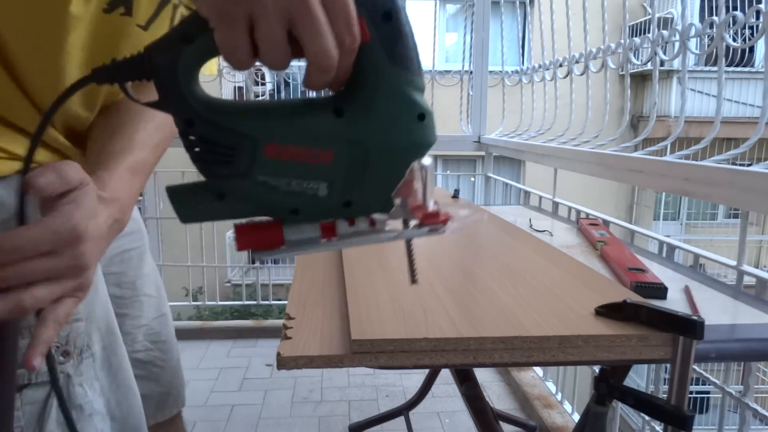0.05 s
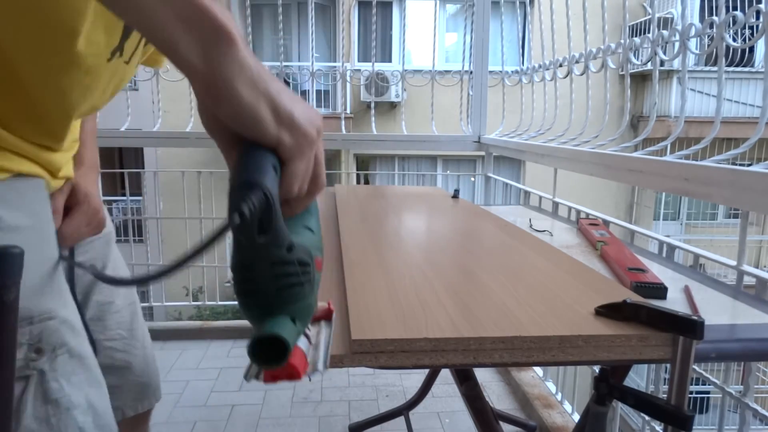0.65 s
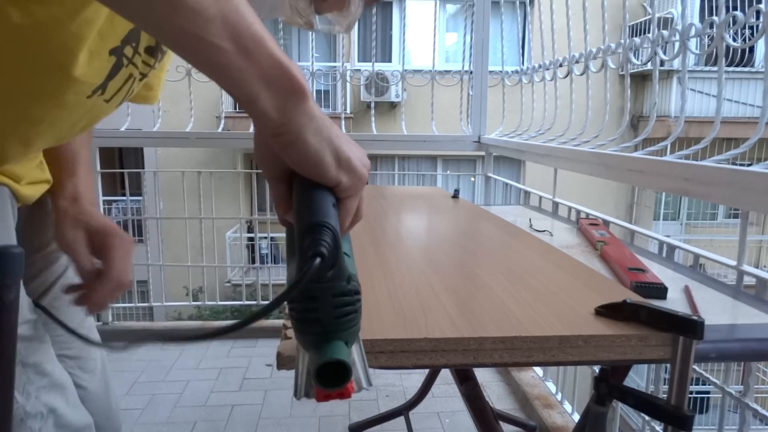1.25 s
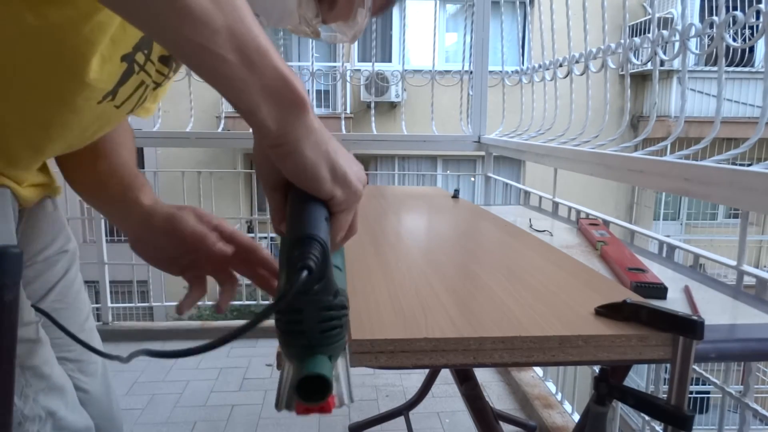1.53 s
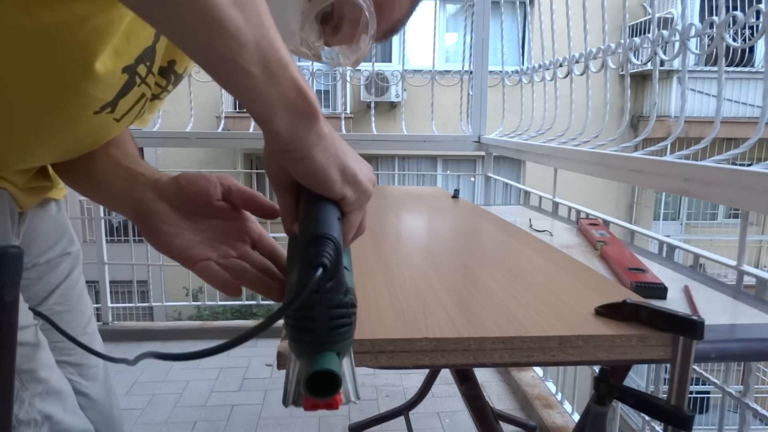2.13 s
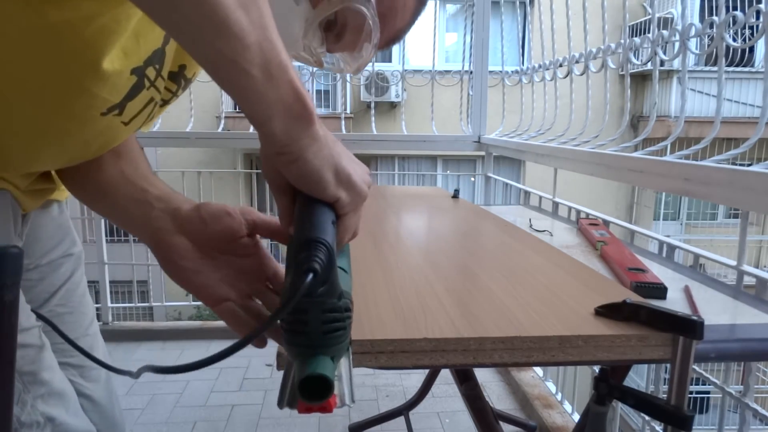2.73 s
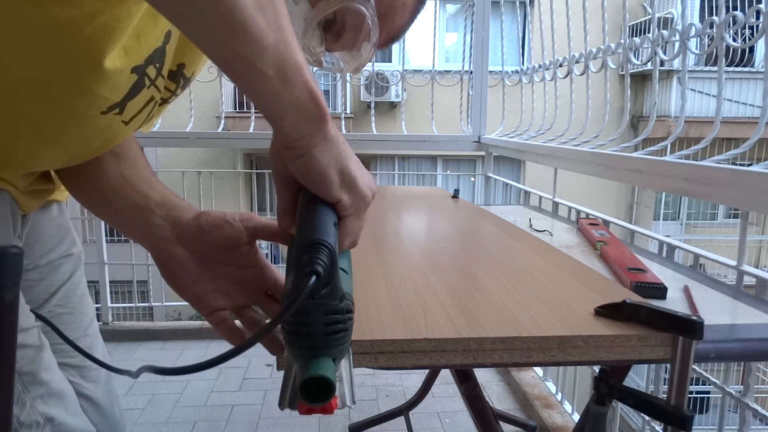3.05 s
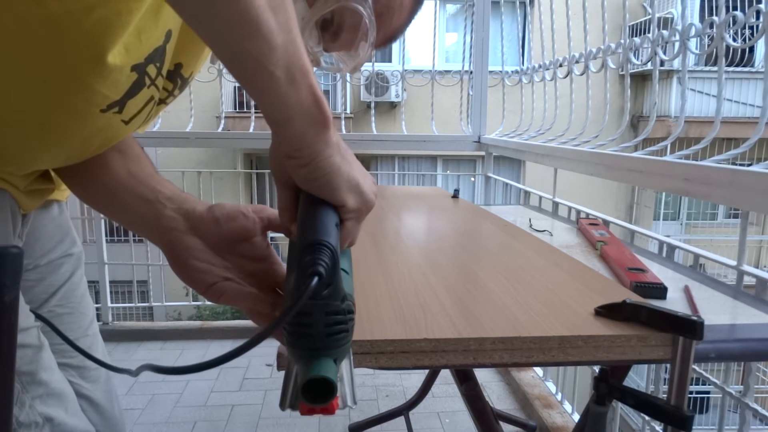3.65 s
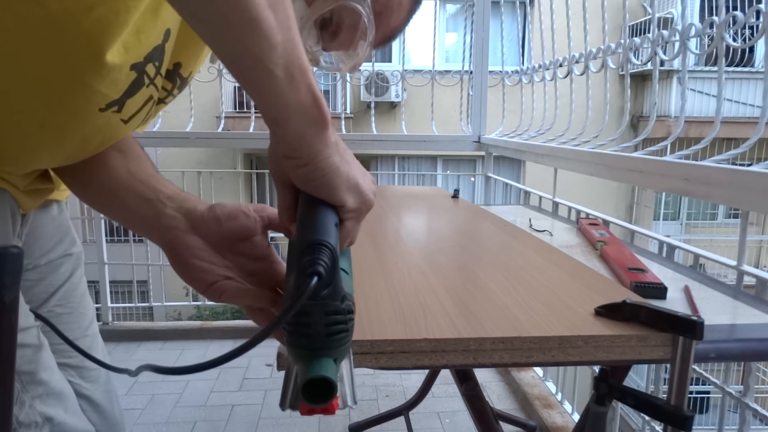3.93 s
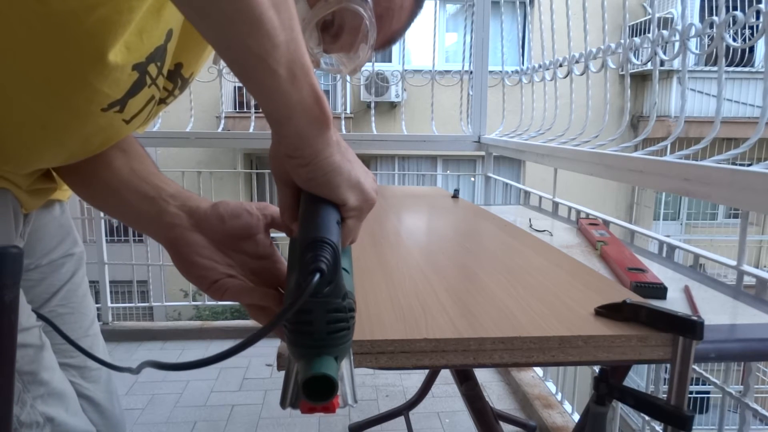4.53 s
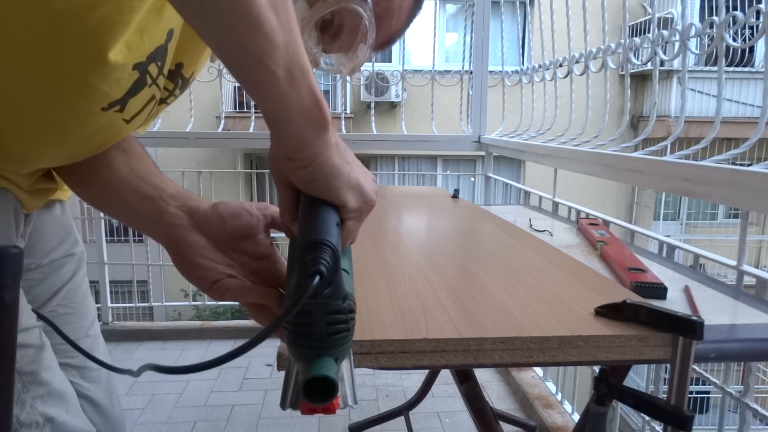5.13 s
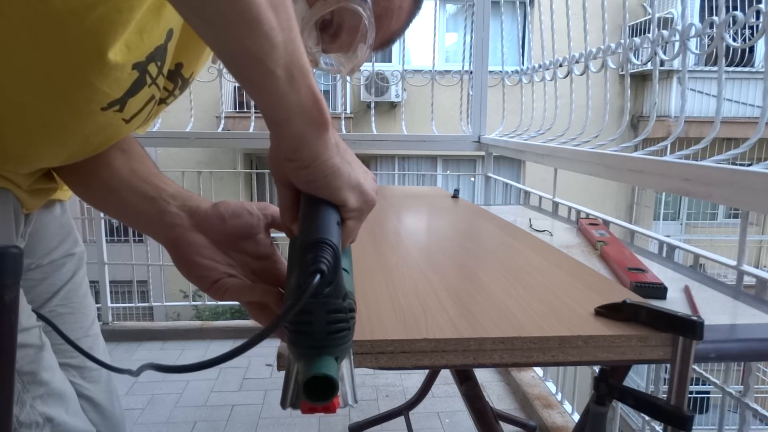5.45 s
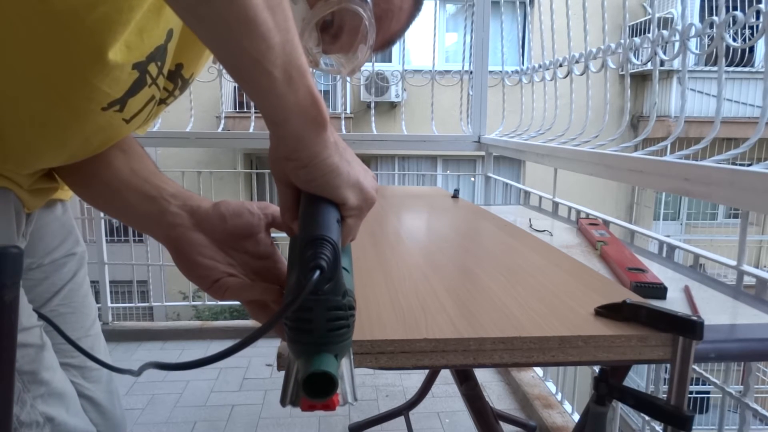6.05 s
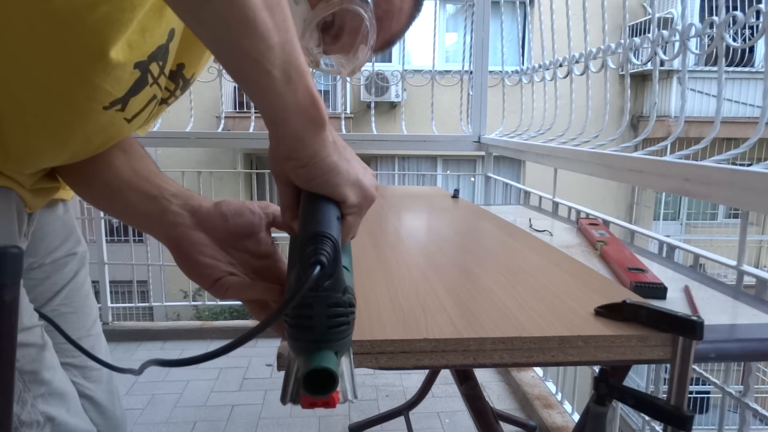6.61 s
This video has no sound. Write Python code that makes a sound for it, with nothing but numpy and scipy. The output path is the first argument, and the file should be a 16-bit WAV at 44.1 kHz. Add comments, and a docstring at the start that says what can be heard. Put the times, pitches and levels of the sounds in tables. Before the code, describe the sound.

A power cord slides through a hand and clothes rustle softly. A jigsaw is set on a wooden board with a few light clacks, and its trigger clicks. About halfway through, the motor starts slowly, rattling and knocking, then speeds up into a loud, rasping cut with a rising high whine. The saw is close to the microphone, outdoors on a balcony, with faint traffic behind it.

```python
"""A cord slides through a hand, clothes brush, and a jigsaw's shoe clacks down on a clamped chipboard panel.
The trigger clicks and the motor is eased up to speed. The crank rattles tool and board on every stroke,
the blade rasps, and the gear whine climbs through the resonances of the housing.
Short echoes come off the balcony; behind it the town murmurs, with a few faint, far squeals."""
import sys
import numpy as np
from scipy import signal
from scipy.fft import rfft, irfft, next_fast_len
from scipy.io import wavfile
from scipy.ndimage import uniform_filter1d, map_coordinates

SR = 44100
rng = np.random.default_rng(int(sys.argv[2]) if len(sys.argv) > 2 else 0)


def wrap_up_sound(samples):
    """Save the sound to the file named by the first command line argument, as 16-bit audio."""
    columns = np.atleast_2d(samples).T
    # keep every value between -1 and 1, then stretch to whole-number steps
    tamed = np.clip(columns, -1, 1)
    steps = np.round(tamed * 32767).astype(np.int16)
    wavfile.write(sys.argv[1], SR, steps)


N = 303408
TIME = np.arange(N) / SR
FFT_SIZE = 2 * next_fast_len(N // 2 + SR // 4)
HZ = np.maximum(np.arange(FFT_SIZE // 2 + 1) * SR / FFT_SIZE, 1)

# The motor's run-up. Each row: time in seconds, mesh rate in gear teeth per second.
RUN_UP = [(3.695, 105), (3.755, 118), (3.77, 164), (3.93, 263), (4.24, 397), (4.33, 413), (4.43, 439),
          (4.58, 512), (4.79, 747), (5.16, 1307), (5.29, 1438), (5.46, 1534), (5.7, 1611), (5.86, 1634),
          (6.17, 1666), (6.31, 1689), (6.52, 1802), (6.68, 1857), (6.88, 1893)]
CRANK_TEETH, PINION_TEETH, TEETH_PER_BOUNCE = 56, 4, 42.7
TAKE_UP_S = .025  # the drive takes up its play
# Depths of the tool's judder and the pinion's chatter at full slack; both shrink as the speed rises.
JUDDER_DB, PANEL_JUDDER_DB, WHINE_CHATTER_DB, HOUSING_CHATTER_DB = 1.5, 2.5, 5.5, 2.2
# Loudness with speed. Each law: relative top in dB, knee in teeth per second, dB per decade below it.
HOUSING_LAW, BLADE_LAW, SHOE_LAW = (-19, 675, 32.7), (-20, 990, 35.4), (-30.5, 930, 31.4)
PANEL_LAW, ROLLER_LAW = (-49.5, 600, 30), (-30.5, 380, 30)
# The broad tone of the sawing. Each row: frequency in Hz, relative level in dB.
SAW_TONE = [(53, -101), (90, -46), (350, -23), (381, -16), (504, -12.5), (562, -15), (864, -8),
            (1120, -6.5), (2090, 0.5), (2540, -1.5), (3290, 0), (4540, -10), (7140, 1), (9050, -5.5),
            (15500, -22.5)]
# Resonances and hollows of tool and board. Each row: centre in Hz, width in Hz, lift in dB.
BODY_MODES = [(218, 40, 10), (316, 36, 13), (385.7, 17, 11), (505, 70, -11), (576, 22, 7.5), (648, 22, 4),
              (680, 22, -4), (712, 30, 6), (841, 20, 9.5), (897, 24, 9), (980, 26, 3.5), (1058, 24, 5),
              (1118, 40, -8), (1385, 70, 4.5), (1550, 30, -3.5), (1645, 80, 6.5), (1790, 40, 4),
              (1957, 34, 6), (2120, 90, 4), (2460, 60, -3), (2715, 60, 3.5), (2900, 90, 2), (3150, 270, 5),
              (3325, 70, 2), (4130, 430, 6), (4540, 690, 2.5), (4900, 290, 6), (5790, 70, 5), (6110, 70, 4),
              (6990, 90, 2.5), (7305, 70, 2), (8800, 150, 5), (9070, 690, 4.5), (11900, 480, -6)]
# The partials of the gear whine. Each row: multiple of the mesh rate, relative level at rest in dB,
# change at full speed in dB, mesh rate where it sets in, in teeth per second.
WHINE_PARTIALS = [(1, -26.5, 16.5, 1500), (2, -19, 6.5, 620), (3, -12.5, 0, 860), (4, -19, 6, 1200),
                  (6, -23, 9, 1350), (6.5, -24, 6, 1720), (8, -1.5, -28, 235), (11, 2, -36, 860)]
# Resonances and hollows the whine climbs through. Each row: centre in Hz, width in Hz, lift in dB.
WHINE_MODES = [(1400, 150, 14), (1720, 200, -3), (2100, 150, 14), (2500, 500, -10), (3010, 130, 11),
               (3220, 140, 9), (3335, 90, 10), (3650, 200, -1), (4100, 200, 3), (4700, 1600, -6),
               (5000, 300, 3), (5830, 220, 2), (6950, 240, 11), (7280, 180, 7), (8870, 300, 9),
               (9830, 280, 12), (10350, 400, -7), (10830, 300, 10), (12000, 4000, -13), (13300, 300, 5)]
# The rattle lapses as the blade loses its bite. Each row: time in seconds, half length in seconds, dip in dB.
BITE_LAPSES = [(3.993, .012, -8), (4.34, .008, -4)]
# The blade snags and the shoe bumps the board. Each row: start in seconds, level in dB, treble in dB.
SNAGS = [(3.761, -36, -6), (3.823, -25, -7), (3.829, -27, -5), (4.138, -22, 2), (4.189, -24, -6),
         (4.346, -14, -6), (4.353, -18, -5), (4.392, -20, -1), (4.451, -22, -4), (4.534, -9, -10),
         (4.568, -18, -2), (4.61, -19, -5), (4.686, -11.5, -3), (4.692, -12.5, -2), (4.806, -13, -12),
         (4.887, -12, -12)]
# How firmly the shoe is pressed on the board. Each row: time in seconds, gain in dB.
SHOE_PRESSURE = [(4.6, 3.5), (5.4, -0.5), (6.12, -2.5), (6.35, -0.5), (6.66, 2.5), (6.88, 0.5)]
# The panel's boom sets in as the blade bites. Each row: time in seconds, relative level in dB.
PANEL_BOOM = [(3.85, -80), (3.9, -50), (4.15, -48.5), (4.62, -41), (4.87, -38.5), (5.15, -52),
              (5.56, -41.5), (5.74, -57), (6.14, -45), (6.38, -46), (6.66, -44.5), (6.88, -51)]
# The low modes of the clamped panel. Each row: pitch in Hz, t60 in seconds, gain in dB.
PANEL_MODES = [(212, .1, -9), (318, .12, -7), (386, .27, 0), (578, .12, -6)]
# The board sings out as the shoe shifts. Each row: peak time, rise and fall in seconds, pitch in Hz,
# level in dB.
BOARD_RINGS = [(5.4, .3, .35, 897, -34.5), (5.75, .15, .15, 577, -42), (6.4, .18, .1, 833, -34.5),
               (6.72, .12, .16, 842, -32)]
# The modes of the guide roller. Each row: pitch in Hz, t60 in seconds, relative level in dB.
ROLLER_MODES = [(1447, .06, -7), (1974, .045, 3), (2100, .035, 10), (3270, .018, -1)]
# The roller's chatter flares and fades. Each row: time in seconds, gain in dB.
ROLLER_FLARE = [(3.7, -11), (3.78, -3), (3.86, 2), (3.9, -2), (3.97, 6.5), (3.99, 0), (4.02, 6), (4.09, 1),
                (4.16, -9), (4.28, -4), (4.37, -8), (4.47, -8), (4.6, -8), (4.72, -9), (4.82, 9),
                (4.92, -13), (5.2, -8)]

# The shoe is set on the board. Each row: start in seconds, relative level in dB, treble in dB,
# t60 of the clatter in seconds, favoured pitch in Hz.
SHOE_TAPS = [(1.385, -42, -17, .06, 1200), (1.557, -39, -5, .11, 2400), (1.57, -37, -14, .065, 1350),
             (1.671, -32.5, 0, .063, 3600), (1.682, -34, -5, .07, 800)]
# The tone of the shoe's clatter. Each row: frequency in Hz, relative level in dB.
SHOE_TONE = [(120, -57), (200, -37), (335, -10), (495, -30), (815, -11), (1390, -9), (2450, -6),
             (2830, -17), (3200, -9), (3890, -6), (6290, -10), (7510, -6.5), (14000, -41)]
# Resonances and a hollow in that clatter. Each row: centre in Hz, width in Hz, lift in dB.
SHOE_MODES = [(754, 79, 13.5), (1160, 48, -2), (1860, 96, 7), (2874, 140, 18)]
# The board rings under a tap. Each row: pitch in Hz, t60 in seconds, relative level in dB.
WOOD_MODES = [(824, .07, -5), (1179, .11, -1), (1389, .1, 0), (2078, .08, -7), (2390, .07, -3),
              (2783, .06, -6), (3876, .04, 0)]
# The trigger clicks. Each row: start in seconds, relative level in dB, treble in dB, t60 in seconds.
TRIGGER_CLICKS = [(2.745, -54, 4, 0.034), (3.108, -42.5, -3, 0.045), (3.666, -36.5, -3, 0.08)]
# The tone of the trigger. Each row: frequency in Hz, relative level in dB.
TRIGGER_TONE = [(880, -46), (1500, -20), (2940, -34), (3930, -2), (4770, -17), (7350, 1), (13100, -30),
                (15000, -55)]
# The cord runs through the hand. Each row: time of the fastest slide, rise and fall in seconds, level in dB.
CORD_PULLS = [(.168, 0.065, 0.12, -35), (0.586, 0.059, 0.049, -33)]
# Clothes brush as the arm moves. Each row: peak time in seconds, level in dB.
RUSTLES = [(.375, -59), (.86, -48), (.935, -48.5), (1.035, -48.5), (1.11, -47.5), (1.198, -46), (2.04, -52)]
# The tone of rubbing cord and cloth. Each row: frequency in Hz, relative level in dB.
RUB_TONE = [(410, -42), (700, -10), (1020, -9), (1120, -18), (1370, -5.5), (1690, -5.5), (2220, 1),
            (4830, -1.5), (7600, 1.5), (9720, -7), (15500, -34)]

# The balance of the two microphone ports. Each row: frequency in Hz, left minus right in dB.
PORT_BALANCE = [(60, 0.0), (92, 0.0), (140, 0.0), (210, 0.0), (330, 0.0), (500, 0.0), (770, 0.35),
                (1170, 0.62), (1790, 0.77), (2740, 1), (4190, 1), (6410, 0.0), (9810, 0.0), (15000, 0.0)]
# The phase between the ports. Each row: frequency in Hz, lead of the left in radians.
PORT_LEAD = [(40, 0.1), (250, 0.4), (550, 0.6), (950, 0.6), (2200, 0.38), (4480, 0.12), (9300, 0.1),
             (10200, 0.7), (11500, 0.1), (15300, -0.0)]
# The tone of far traffic. Each row: frequency in Hz, relative level in dB.
TOWN_TONE = [(15, -76), (25, -34), (177, -7.5), (208, -3.5), (244, -5), (335, -7), (425, -12.5), (539, -13),
             (1130, -3.5), (1400, -2), (2080, -2), (4730, -11.5), (6500, -12.5), (7030, -14.5),
             (14000, -24.5)]
# The stereo width of the traffic. Each row: frequency in Hz, side minus mid in dB.
TOWN_WIDTH = [(60, -11), (130, -21), (290, -15), (640, -9.5), (1410, -9), (3100, -11), (6820, -20.5),
              (15000, -12)]
# Resonances and hollows of the yard. Each row: centre in Hz, width in Hz, lift in dB.
YARD_MODES = [(80.5, 68, -3), (298.6, 21, 8), (485, 75, -9), (927, 550, 7.5), (8100, 3300, 11.5),
              (13050, 4000, -17)]
# Faint far squeals. Each row: start in seconds, length in seconds, pitch in Hz, level in dB.
SQUEALS = [(1.237, 0.32, 1162, -55.5), (1.685, 0.49, 1097, -54.5), (2.683, 0.34, 1135, -57),
           (2.6, 0.34, 6940, -61.5), (2.946, 0.38, 6910, -54.5), (3.424, 0.16, 6915, -59)]


def jigsaw():
    """Crank knocks and rasp shake panel, shoe and housing; the thin blade only rasps."""
    mesh, = in_time(RUN_UP)
    start_s = RUN_UP[0][0]
    teeth = np.cumsum(mesh * (TIME > start_s)) / SR
    turns = teeth / CRANK_TEETH
    slack = 1 - mesh / np.max(mesh)  # slow gears run loose and rough
    judder = slack * np.cos(2 * np.pi * teeth / TEETH_PER_BOUNCE)  # the tool bounces on the board
    chatter = slack * np.cos(2 * np.pi * teeth / PINION_TEETH)  # the pinion, once a motor turn
    body_db = at_hz(SAW_TONE, HZ) + lift(BODY_MODES, HZ) + crowded_modes(ripple_db=2, spacing_hz=60)
    knocks = colour(crank_knocks(turns, jitter_s=.00005, uneven_db=1, reversal_db=-1), body_db)
    chips = colour(rasp(turns, stroke_db=.3, grain_db=1), body_db)
    board = panel_boom(knocks, chips, judder) + panel_hum(mesh, turns) + board_rings()
    shoe = shoe_rattle(mesh, turns, chips, judder, body_db)
    housing = housing_rattle(mesh, knocks, chips, slack, judder, chatter)
    roller = roller_chatter(mesh, knocks + chips, slack, judder)
    blade_db = speed_db(mesh, BLADE_LAW) + JUDDER_DB * judder - 1.76
    blade = from_db(blade_db) * even(band(chips, 4670, 14100))
    gears = gear_whine(mesh, turns, slack, chatter)
    bite = from_db(sum(db * swell(s, half, half) for s, half, db in BITE_LAPSES))
    engaged = np.clip((TIME - start_s) / TAKE_UP_S, 0, 1)
    return (board + shoe + (housing + roller + gears) * bite + blade) * engaged + blade_snags(body_db)


def crank_knocks(turns, jitter_s, uneven_db, reversal_db, count=40):
    """Loose parts knock at the same crank angles every turn; reversal_db weights the stroke ends."""
    angles = (np.arange(count) + rng.random(count)) / count
    force = rng.choice([-1, 1], count) * from_db(reversal_db * np.cos(4 * np.pi * angles))
    when = np.interp(np.arange(256)[:, None] + angles, turns, TIME, right=-1)
    at = np.round((when + jitter_s * rng.standard_normal(when.shape)) * SR).astype(int)
    force = force * from_db(uneven_db * rng.standard_normal(when.shape))
    heard = (at >= 0) & (at < N)
    return even(np.bincount(at[heard], force[heard], N))


def rasp(turns, stroke_db, grain_db):
    """Teeth tear chips out of the board, in a surge on each half stroke."""
    surge_db = stroke_db * np.cos(4 * np.pi * turns) + grain_db * drift(700)
    return even(rng.standard_normal(N) * from_db(surge_db))


def gear_whine(mesh, turns, slack, chatter, sway=.28, throb_db=3, wander=.17, flutter_db=2.2):
    """Gear teeth sing; each half stroke loads them, which puts side lines on every partial."""
    load = np.cos(4 * np.pi * turns)
    phase = 2 * np.pi * CRANK_TEETH * turns + sway * load + wander * (1 + slack) * drift(70)
    tone = np.zeros(N)
    for k, level_db, rise_db, onset in WHINE_PARTIALS:
        swell_db = level_db + rise_db * (1 - slack) + lift(WHINE_MODES, k * mesh)
        gain = from_db(swell_db + flutter_db * drift(140)) / (1 + (onset / mesh) ** 24)
        tone += gain * np.sqrt(2) * np.sin(k * phase)
    # Narrow high modes break up the upper partials.
    ripple_db = crowded_modes(ripple_db=4, spacing_hz=60) * np.minimum(HZ / 10000, 1)
    tone = colour(tone * from_db(WHINE_CHATTER_DB * chatter), ripple_db)
    tone = band(tone, 1250, 12500)  # the small housing radiates no bass and muffles the very top
    return from_db(speed_db(mesh, HOUSING_LAW)) * tone * rms_one(from_db(throb_db * load))


def housing_rattle(mesh, knocks, chips, slack, judder, chatter):
    """The housing carries rasp and knocks in the upper mids, roughened by the slack pinion."""
    level_db = speed_db(mesh, HOUSING_LAW) + JUDDER_DB * judder + HOUSING_CHATTER_DB * chatter
    return from_db(level_db - 3.5 - .22 * slack) * even(band(knocks + from_db(6.5) * chips, 965, 4400))


def blade_snags(body_db, t60=.03):
    """The blade catches and the shoe bumps the board in short, hard knocks."""
    return band(taps([(*row, t60) for row in SNAGS], body_db, treble_hz=4530), 220, 6900)


def shoe_rattle(mesh, turns, chips, judder, body_db):
    """The shoe bounces with the crank, louder the more firmly it is pressed down."""
    bounces = colour(crank_knocks(turns, jitter_s=.0001, uneven_db=2.5, reversal_db=0), body_db)
    level_db = speed_db(mesh, SHOE_LAW) + in_time(SHOE_PRESSURE)[0] + JUDDER_DB * judder - 1
    return from_db(level_db) * even(band(bounces + from_db(-7) * chips, 550, 1200))


def roller_chatter(mesh, shaking, slack, judder):
    """The guide roller is shaken into ringing while the saw runs slowly."""
    level_db = speed_db(mesh, ROLLER_LAW) + in_time(ROLLER_FLARE)[0] + JUDDER_DB * judder
    return from_db(level_db) * slack * even(ring(shaking, ROLLER_MODES))


def panel_boom(knocks, chips, judder):
    """The panel booms with the low end of the knocks and a little rasp."""
    level_db = in_time(PANEL_BOOM)[0] + PANEL_JUDDER_DB * judder - 1.5
    return from_db(level_db) * even(band(knocks + from_db(-9) * chips, 33, 460))


def panel_hum(mesh, turns):
    """Each up-stroke lifts the panel; it hums when a multiple of the stroke rate meets a mode."""
    thumps = np.diff(np.floor(turns), prepend=0) * from_db(2.2 * drift(5))
    return from_db(speed_db(mesh, PANEL_LAW)) * band(ring(thumps, PANEL_MODES), 180, 880)


def board_rings(t60=.16):
    """The scraping shoe keeps one board mode ringing unevenly for a moment."""
    return sum(from_db(db) * swell(s, rise, fall) * even(ring(rng.standard_normal(N), [(hz, t60, 0)]))
               for s, rise, fall, hz, db in BOARD_RINGS)


def handling():
    """The cord is pulled clear, clothes brush, the shoe is set down, the trigger is squeezed."""
    cord = rubbing(sum(from_db(db) * swell(s, rise, fall) for s, rise, fall, db in CORD_PULLS))
    clothes = rubbing(sum(from_db(db) * swell(s, rise_s=.04, fall_s=.04) for s, db in RUSTLES))
    trigger = from_db(1) * taps(TRIGGER_CLICKS, at_hz(TRIGGER_TONE, HZ))
    return cord + clothes + shoe_knocks() + trigger


def shoe_knocks(db_per_octave=13):
    """Each tap is a short clatter and a woody ring; where it lands decides which modes speak."""
    tone_db = at_hz(SHOE_TONE, HZ) + lift(SHOE_MODES, HZ)
    clatter = from_db(4.5) * taps([row[:4] for row in SHOE_TAPS], tone_db, treble_hz=2420)
    wood = np.zeros(N)
    for start, tap_db, _, _, favoured_hz in SHOE_TAPS:
        age = np.clip(TIME - start, 0, 1)
        for hz, t60, mode_db in WOOD_MODES:
            away_db = db_per_octave * abs(np.log2(hz / favoured_hz))
            wood += from_db(tap_db + mode_db - away_db - 60 * age / t60) * np.sin(2 * np.pi * hz * age)
    return clatter + band(wood, 650, 9000)


def rubbing(motion, grain_db=1):
    """Cord or cloth catches and slips over skin in tiny steps."""
    grains = rng.standard_normal(N) * from_db(grain_db * drift(450))
    return motion * rms_one(colour(grains, at_hz(RUB_TONE, HZ)))


def ports(x):
    """Near sounds reach the two ports with a small difference in level and phase."""
    half = from_db(at_hz(PORT_BALANCE, HZ) / 2) * np.exp(.5j * at_hz(PORT_LEAD, HZ))
    return irfft(rfft(x, FFT_SIZE) * np.array([half, 1 / half]), FFT_SIZE)[:, :N]


def balcony(x, echo_db, t60, count=40):
    """Floor, wall and railing send back sparse, thin echoes, different on each side."""
    delay_s = rng.uniform(.0024, .058, (2, count))
    strength = rng.choice([-1, 1], delay_s.shape) * from_db(-60 * delay_s / t60)
    echoes = np.zeros((2, SR // 4))
    echoes[[[0], [1]], (delay_s * SR).astype(int)] = strength
    echoes *= from_db(echo_db) / np.sqrt(np.sum(echoes ** 2) / 2)
    return signal.fftconvolve(band(x, 490, 25000)[None], echoes, axes=1)[:, :N]


def traffic(mid_db):
    """Far traffic murmurs in the yard, a little different at each port."""
    tone_db = at_hz(TOWN_TONE, HZ) + lift(YARD_MODES, HZ)
    mid, side = rms_one(colour(rng.standard_normal((2, N)), tone_db))
    return from_db(mid_db) * (mid + colour(side, at_hz(TOWN_WIDTH, HZ)) * [[1], [-1]])


def squeals(blur_hz=75.2, direct=1.2, fade_s=.13):
    """Far tones swell, hold and fade, smeared by their many paths between the houses."""
    paths = rms_one(np.abs(direct + drift(blur_hz) + 1j * drift(blur_hz)))
    smear = drift(blur_hz)
    out = np.zeros(N)
    for start, length, hz, level_db in SQUEALS:
        fade = np.clip(np.minimum(TIME - start, start + length - TIME) / fade_s + .5, 0, 1)
        out += from_db(level_db) * fade * np.sqrt(2) * np.cos(2 * np.pi * hz * TIME + smear)
    return paths * out


def taps(rows, tone_db, treble_hz=3000):
    """Contacts on one object: each is a dying crowd of modes with its own share of treble."""
    out = np.zeros(N)
    for start, level_db, treble_db, t60 in rows:
        age = TIME - start
        hit = (age >= 0) * from_db(level_db - 60 * np.clip(age / t60, 0, 3)) * rng.standard_normal(N)
        dull = signal.sosfilt(signal.butter(2, treble_hz, fs=SR, output="sos"), hit)
        out += dull + from_db(treble_db) * (hit - dull)
    return colour(out, tone_db - 10 * np.log10(np.mean(from_db(tone_db) ** 2)))


def ring(force, modes):
    """A force drives a set of decaying modes."""
    out = np.zeros(N)
    for hz, t60, gain_db in modes:
        radius, angle = from_db(-60 / (t60 * SR)), 2 * np.pi * hz / SR
        poles = [1, -2 * radius * np.cos(angle), radius * radius]
        out += from_db(gain_db) * signal.lfilter([1, 0, -1], poles, force + 1e-18)
    return out


def crowded_modes(ripple_db, spacing_hz):
    """Countless narrow high modes leave a fine ripple on the response, in dB."""
    ripple = map_coordinates(rng.standard_normal(1024), [HZ / spacing_hz], order=2, mode="wrap")
    return ripple_db * rms_one(ripple) * HZ / (HZ + 2000)


def speed_db(mesh, law):
    """A part grows louder with motor speed and levels off above a knee."""
    top_db, knee, slope_db = law
    return top_db - slope_db * np.log10(1 + (knee / mesh) ** 4) / 4


def swell(peak_s, rise_s, fall_s):
    """A smooth rise and fall of height 1."""
    late = TIME - peak_s
    return 1 / (1 + (late / np.where(late < 0, rise_s, fall_s)) ** 2) ** 2


def drift(rate):
    """A smooth random wobble of rms 1, with `rate` new values a second."""
    return rms_one(map_coordinates(rng.standard_normal(8192), [TIME * rate], order=2, mode="wrap"))


def colour(x, gain_db):
    """Minimum-phase filter: resonances ring after their cause."""
    cepstrum = irfft(gain_db * np.log(10) / 20)[:FFT_SIZE // 2]
    cepstrum[1:] *= 2
    return irfft(rfft(x, FFT_SIZE) * np.exp(rfft(cepstrum, FFT_SIZE)))[..., :N]


def band(x, low_hz, high_hz):
    """Steep band-pass."""
    edges_hz = [low_hz, min(high_hz, .45 * SR)]
    return signal.sosfilt(signal.butter(4, edges_hz, "band", fs=SR, output="sos"), x)


def even(x):
    """Hold the slow level at rms 1, keeping the single blows."""
    return x / np.sqrt(np.abs(uniform_filter1d(x ** 2, size=4000)) + 1e-6 * np.mean(x ** 2))


def lift(modes, hz):
    """Gain in dB of a set of resonances."""
    return sum(db / (1 + (2 * (hz - centre) / width) ** 2) for centre, width, db in modes)


def at_hz(points, hz):
    """Read a curve on a log-frequency axis."""
    point_hz, value = np.transpose(points)
    return np.interp(np.log(hz), np.log(point_hz), value)


def in_time(rows):
    """One control per column, a value for every sample."""
    seconds, *columns = np.transpose(rows)
    return [np.interp(TIME, seconds, column) for column in columns]


def rms_one(x):
    """Scale to rms 1."""
    return x / np.sqrt(np.mean(x ** 2) + 1e-20)


def from_db(db):
    """Decibels to gain."""
    return 10 ** (np.asarray(db) / 20)


def scene():
    """The saw close by, the town behind it."""
    near = jigsaw() + handling()
    return ports(near) + balcony(near, echo_db=-20, t60=.094) + traffic(mid_db=-51.5) + squeals()


def record(dry, cutoff_hz=15500):
    """The top is cut steeply."""
    return signal.sosfilt(signal.ellip(10, .1, 90, cutoff_hz, fs=SR, output="sos"), dry)


dry = scene()
out = record(dry)
wrap_up_sound(out)
```